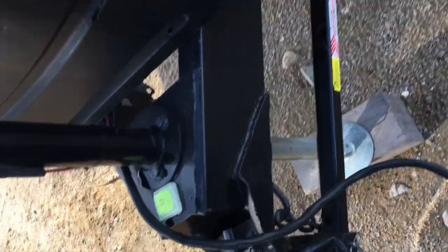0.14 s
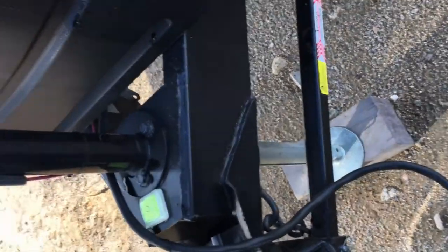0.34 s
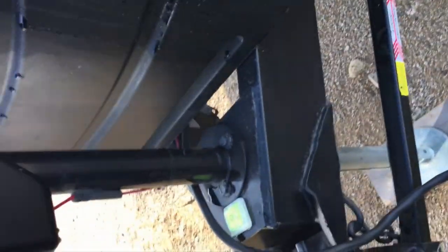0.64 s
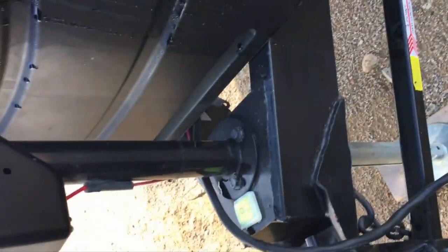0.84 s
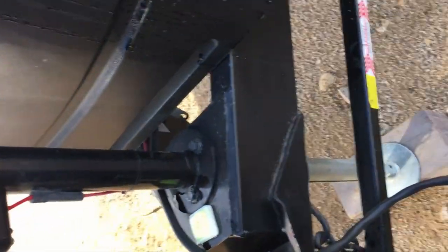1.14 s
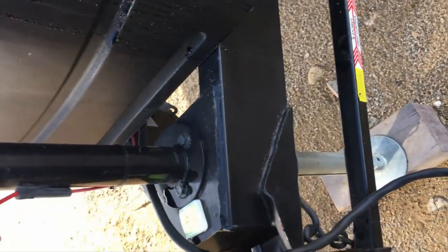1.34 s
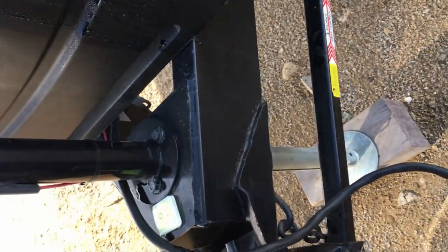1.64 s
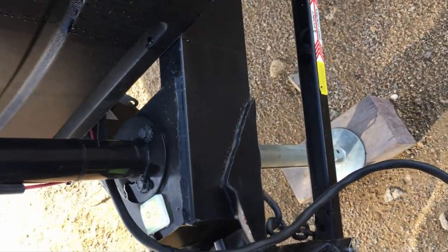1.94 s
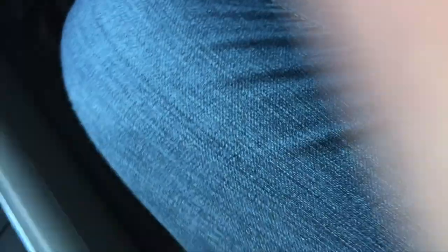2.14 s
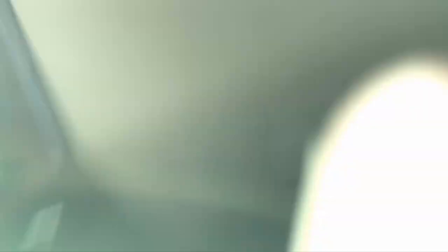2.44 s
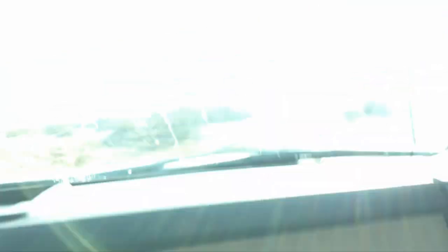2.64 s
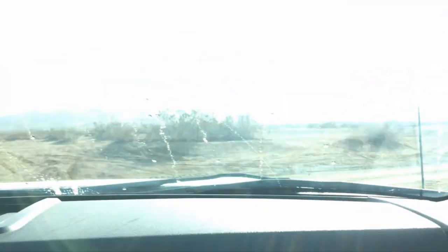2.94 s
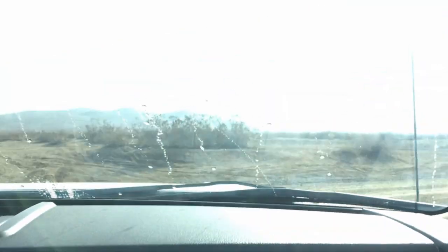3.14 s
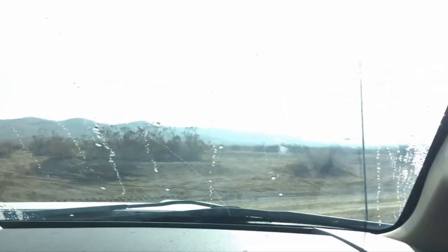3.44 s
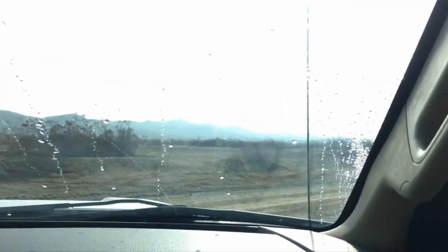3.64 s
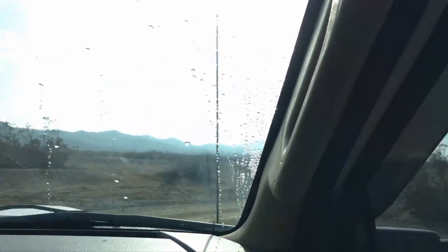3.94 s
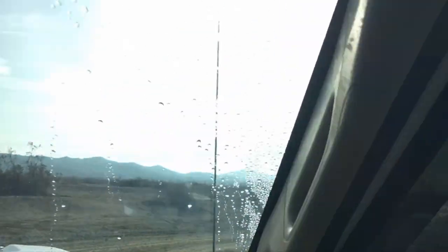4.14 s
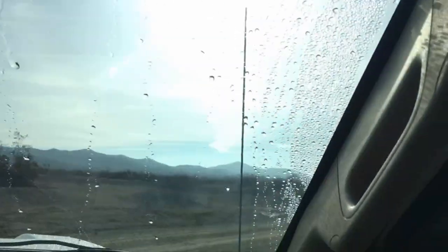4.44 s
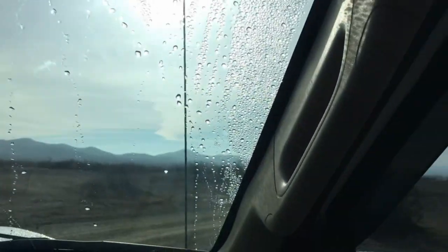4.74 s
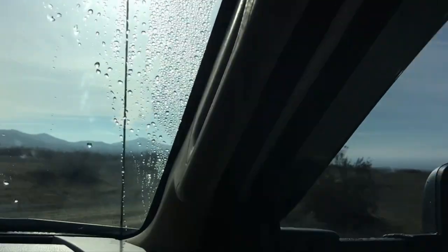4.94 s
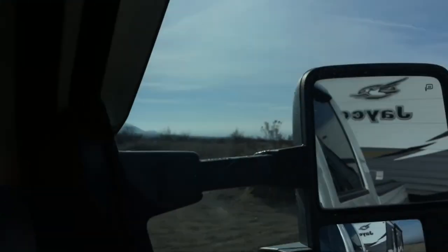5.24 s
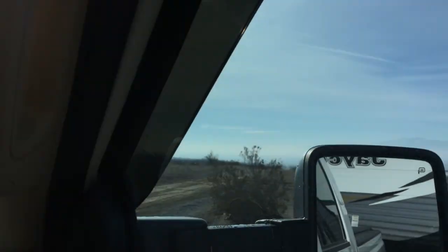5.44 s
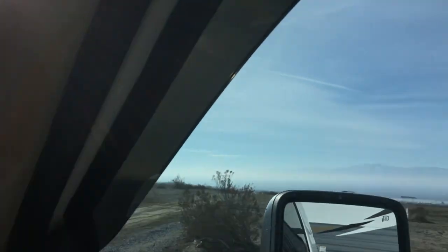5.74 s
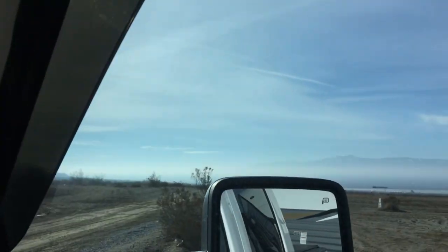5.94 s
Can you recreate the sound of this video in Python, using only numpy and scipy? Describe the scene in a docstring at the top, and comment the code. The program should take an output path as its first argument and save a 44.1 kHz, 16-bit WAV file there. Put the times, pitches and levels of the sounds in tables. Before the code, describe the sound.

A loud, rough motor-and-gear grind with metallic rattle and small grabbing chirps fills the first two seconds, recorded at arm's length. It cuts abruptly to the inside of a truck creeping along a dirt track, dull and bassy. A hand brushes and taps the camera, the engine note rises slightly then sinks, and loose panels click and clack over rougher ground.

```python
"""First an electric trailer jack runs close by: gears whine, teeth grind and rattle, the brushes hiss.
Tones stand for its gears and motor, filtered noise for its friction, dying sines for its ringing post.
After a moment of near silence we sit in a truck creeping along a dirt track: low tones make the engine drone,
noise the tyre rumble and grit, and dying sines the knocks of loose trim. A hand ticks and brushes on a camera.
Soft thuds of filtered noise fall in both parts, over a faint steady hiss."""
import sys
import numpy as np
from scipy import signal
from scipy.fft import rfft, irfft
from scipy.io import wavfile

SR = 44100
rng = np.random.default_rng(int(sys.argv[2]) if len(sys.argv) > 2 else 0)


def int16_out(signal):
    """Quantize to a 16-bit WAV file."""
    q = np.round(np.clip(np.atleast_2d(signal).T, -1, 1) * 32767)
    wavfile.write(sys.argv[1], SR, q.astype(np.int16))


N = 269010
TIME, HZ = np.arange(N) / SR, np.fft.rfftfreq(N, 1 / SR)  # seconds; frequencies of a full-length spectrum

JACK_OFF_S, CABIN_ON_S = 2.1335, 2.181
EDGE_HZ = 15700  # upper limit of the sound

# turning rate of the jack's first gear: (time [s], rate [Hz])
GEAR_SPEED = [(0.0, 67.04), (0.25, 67.73), (1.55, 69.21), (1.85, 68.46)]
# whine of the gear train: (multiple of the turning rate, relative level [dB])
GEAR_TONES = [(.62, -43), (1, -59), (1.23, -48.5), (1.86, -51.5), (3.08, -40.5), (4.6, -42), (4.92, -52.5),
              (6.02, -47), (7, -47), (8.03, -41.5), (8.88, -48.5), (9.08, -42), (11, -41), (12, -52),
              (13.95, -43), (15, -36.5), (15.8, -52), (17, -40.5), (17.85, -35.5), (19.8, -41), (23, -41.5),
              (27.1, -43), (32.2, -37.5), (37.3, -49), (38.3, -51.5), (45.3, -51)]
# resonances of the gear housing and jack post: (frequency [Hz], width [Hz], boost [dB])
HOUSING_RESONANCES = [(1018, 144, 4.5), (1180, 27, 5), (1250, 36, 6), (1433, 80, 7), (1878, 29, 8.5),
                      (2040, 57, 5), (2247, 250, 9), (2586, 270, 8.5), (2850, 30, 14), (3440, 210, 7),
                      (5260, 95, 10), (5520, 350, 5.5), (6060, 100, 8.5), (6600, 430, 4), (8700, 1100, 9.5),
                      (9900, 320, 14), (10710, 170, 15), (11500, 780, 12.5)]
# broad colour of the grinding teeth: (frequency [Hz], relative level [dB])
GRIND_COLOUR = [(25, -50), (48, -0.5), (90, -9.5), (150, -11), (270, -6), (400, -12.5), (600, -11.5),
                (850, -8.5), (1100, 2.5), (1600, -1.5), (2400, -12.5), (3800, -17), (4800, -46),
                (8000, -36.5)]
# broad colour of the brush hiss: (frequency [Hz], relative level [dB])
BRUSH_COLOUR = [(1500, -11.5), (4000, 8.5), (5000, 1), (6500, 1), (7600, -5.5), (10000, -11.5), (12500, -9),
                (13600, 0), (14700, -44), (16000, -40)]
# motor hum at HUM_ORDER times the turning rate: (time [s], level [dB])
HUM_LEVEL = [(0.0, -41), (0.13, -30), (0.19, -45), (0.24, -30.5), (0.37, -28), (0.44, -34), (0.52, -32.5),
             (0.87, -31), (1.1, -40), (1.28, -36.5), (1.46, -32), (1.61, -31), (1.7, -35), (1.87, -29.5),
             (2.0, -31), (2.12, -36.5)]
# bursts in which the gear mesh grabs: (start [s], length [s], relative level [dB])
MESH_GRABS = [(0.002, 0.022, -18.5), (0.045, 0.075, -23), (0.138, 0.019, -19), (0.167, 0.038, -17.5),
              (0.242, 0.029, -22), (0.282, 0.058, -22), (0.405, 0.039, -19.5), (0.455, 0.055, -21),
              (0.521, 0.049, -21.5), (0.6, 0.036, -21), (0.673, 0.055, -23.5), (0.845, 0.018, -20),
              (0.983, 0.018, -21), (1.017, 0.04, -24), (1.11, 0.08, -22), (1.231, 0.027, -23),
              (1.302, 0.032, -19.5), (1.3685, 0.019, -18), (1.41, 0.075, -23.5), (1.498, 0.026, -21.5),
              (1.587, 0.027, -23), (1.66, 0.04, -24), (1.714, 0.033, -24), (1.826, 0.017, -19.5),
              (1.921, 0.067, -25.5), (2.063, 0.019, -24), (2.099, 0.017, -23)]
# main ring of the steel post: (frequency [Hz], relative level [dB], time to fall 60 dB [s])
POST_MODES = [(1368, -10.5, 0.043), (1437, -2.5, 0.039), (1452, -4.5, 0.029)]
GRIND_DB, HISS_DB = -24, -38.5  # starting levels, before they swell and fade
RASP_DB, RASP_DB_PER_S = -1, -0.43  # gain of the grind's upper part, slowly falling
HUM_ORDER = 10

# firing rate of the engine: (time [s], rate [Hz])
FIRING_RATE = [(2.18, 44.47), (2.85, 45.8), (3.31, 50.66), (3.6, 51.03), (4.35, 52.06), (4.6, 49.95),
               (4.8, 46.95), (5.1, 45.27), (5.5, 45.6), (5.7, 43.2)]
# boom of the engine in the cabin: (time [s], relative level [dB])
DRONE_LEVEL = [(2.18, -39), (2.26, -28), (2.4, -27.5), (2.75, -32.5), (2.9, -26.5), (3.06, -37), (3.2, -36),
               (3.28, -27.5), (3.62, -28.5), (3.9, -26.5), (4.38, -27), (4.46, -38), (4.53, -31),
               (4.76, -31), (4.85, -36), (4.94, -30.5), (5.03, -36.5), (5.33, -30), (5.46, -36),
               (5.52, -29), (5.68, -40), (6.1, -30)]
# firing note and overtones: (multiple of the firing rate, relative level [dB])
ENGINE_TONES = [(1, 2.5), (2, -19), (3, -16), (4, -24.5)]
# roughness of the track under the tyres: (time [s], roughness [dB])
ROAD_ROUGHNESS = [(2.2, -1.5), (2.75, 0.5), (3.05, -3.5), (3.6, -2), (3.95, 1), (4.55, 1), (4.95, 1.5),
                  (5.3, 7.5), (5.7, 5.5), (5.97, -0.5)]
# broad colour of the tyre rumble: (frequency [Hz], relative level [dB])
RUMBLE_COLOUR = [(15, -28), (30, -22), (50, 2), (80, 3), (115, -2), (160, -4.5), (220, -13.5), (300, -13),
                 (420, -20.5), (650, -25), (1500, -85), (5000, -96)]
# broad colour of the gravel, and of the faint hiss: (frequency [Hz], relative level [dB])
RUSTLE_COLOUR = [(200, 7), (500, -2.5), (750, 3.5), (1100, 2), (1600, -2.5), (2200, -7), (3000, -8.5),
                 (4200, -15), (7000, -22), (10000, -28), (15000, -40)]
# resonances of the cabin and its panels: (frequency [Hz], width [Hz], boost [dB])
CABIN_RESONANCES = [(157, 43, 0), (241, 66, 4.5), (340.6, 18, 5), (680, 160, 4), (1460, 190, 4),
                    (2480, 910, 1.5)]
RUMBLE_DB, RUMBLE_FOLLOW = -36, 0.43  # level at zero roughness; dB per dB of roughness
RUSTLE_DB, RUSTLE_FOLLOW = -52, 1
SWAY_DB, SWAY_PER_S = 0.37, 15  # small ruts swell both at random

# knocks of loose trim: (first contact [s], relative level [dB], main ring [Hz], second ring [Hz],
# how far these two stand out [dB], treble tilt [dB per octave])
TRIM_KNOCKS = [(3.514, -47.5, 1345, 605, 4, -9), (4.180, -21.5, 1170, 828, 7, -1),
               (4.205, -44, 1733, 2100, 3, 8), (4.584, -52, 2850, 2460, 2, 10),
               (4.608, -47.5, 1162, 1495, 3, 5), (4.652, -49, 2460, 2130, 10, -5),
               (4.774, -24, 1730, 1480, -7, -0.5), (5.241, -37, 849, 1495, 11, 1.5),
               (5.307, -34.5, 1495, 1735, -2, 0), (5.312, -32.5, 850, 636, 6, -2.5),
               (5.432, -43, 1735, 1495, 17, -2), (5.462, -34.5, 850, 1005, 19, -3),
               (5.614, -44, 2850, 2870, 10, 3), (5.685, -25, 602, 1005, 3, 2),
               (5.692, -31, 591, 1735, 3, -9), (5.72, -33, 604, 1497, 3, 0.5),
               (5.801, -60, 2152, 2150, 7, 3), (5.847, -42.5, 1340, 2830, 8, 0),
               (5.865, -54, 2850, 850, 8, 4), (5.889, -46, 1006, 2166, 12, 2),
               (5.991, -50, 1488, 2850, 10, 1), (6.078, -29.5, 2130, 2130, 14, -4),
               (6.0793, -21.5, 880, 1300, 11, -2)]
# ring of the loose trim: (frequency [Hz], relative level [dB], time to fall 60 dB in a knock [s])
TRIM_MODES = [(325, -9.5, 0.058), (545, -6, 0.08), (603, -3.5, 0.052), (852, -1.5, 0.051),
              (1006.3, -2, 0.06), (1180, -2, 0.047), (1373, -11, 0.05), (1480, 0.5, 0.045),
              (1723, -5, 0.036), (2015, -9, 0.043), (2096, -0.5, 0.026), (2530, -7, 0.029),
              (2900, -18, 0.036), (3580, -24, 0.065)]
# noisy part of a knock, before its tilt: (frequency [Hz], relative level [dB])
CLACK_COLOUR = [(200, 6.5), (600, 1.5), (1500, 11), (2600, 3.5), (3600, -3.5), (5500, -10.5), (8000, -12.5),
                (11000, -20), (15000, -28)]
# rough scuffs of hand and trim: (middle [s], level [dB], half length [s])
SCUFF_STROKES = [(2.533, -41, 0.0093), (3.585, -46, 0.043), (4.078, -46, 0.04), (4.382, -43.5, 0.027),
                 (5.245, -33, 0.0087), (5.308, -33, 0.006), (5.319, -37, 0.006)]
# colour of the scuffs: (frequency [Hz], relative level [dB])
SCUFF_COLOUR = [(200, 12), (350, 15.5), (650, 19.5), (1100, 8), (1600, 9), (2400, 2.5), (3800, -5),
                (6000, -55), (14000, -56)]

# finger ticks on the camera: (time [s], level [dB])
FINGER_TICKS = [(2.1834, -37), (2.239, -45), (2.282, -38), (2.389, -32.5), (2.4903, -26.5), (2.528, -34),
                (2.543, -30.5), (3.2615, -23.5), (3.393, -27.5)]
# ring of the camera case: (frequency [Hz], relative level [dB], time to fall 60 dB [s])
CASE_MODES = [(1850, 4.5, 0.0091), (2570, 9, 0.0071), (3400, 2, 0.0045), (4480, -6, 0.011),
              (6060, -4, 0.0082), (9130, 1.5, 0.0035)]
# strokes of the hand sliding on the camera: (start [s], length [s], relative level [dB])
HAND_STROKES = [(2.176, 0.061, -54), (2.255, 0.17, -60.5), (2.43, 0.1, -57.5), (2.523, 0.024, -48),
                (2.553, 0.036, -49)]
# colour of skin on the camera: (frequency [Hz], relative level [dB])
SKIN_COLOUR = [(500, -12), (2200, 3), (4500, -2), (7000, -6), (11000, -8.5), (14500, -15), (16000, -22)]
STROKE_ATTACK_S, STROKE_RELEASE_S = 0.0071, 0.0099
# dull bumps of camera and truck body: (middle [s], level [dB], pitch [Hz], half length [s])
SOFT_BUMPS = [(0.647, -30, 79.4, 0.031), (1.544, -33.5, 84.66, 0.028), (2.831, -38, 105, 0.15),
              (3.196, -36.5, 135, 0.059), (3.49, -38, 108, 0.06), (4.097, -36.5, 135, 0.04),
              (5.116, -34, 220, 0.006), (4.58, -30.5, 87.5, 0.13), (5.17, -32, 149, 0.039),
              (5.348, -35, 137, 0.047), (5.71, -32, 280, 0.024), (5.726, -35.5, 119.9, 0.055),
              (5.856, -30.5, 111, 0.035)]


def jack(hiss_side_db=-17.0, surge_db=1.65, blow_share=0.37):
    """Uneven tooth blows and sliding friction ring the housing; the brushes hiss with each turn."""
    turns = np.cumsum(curve(GEAR_SPEED)) / SR
    once_a_turn = np.cos(2 * np.pi * turns)
    # a slow reduction gear, 0.1406 s a turn, binds twice a turn, once harder
    slow_turns = (TIME - .052) / .1406
    surge = surge_db * (np.cos(4 * np.pi * slow_turns) + 0.57 * np.cos(2 * np.pi * slow_turns))
    housing_db = resonances(HOUSING_RESONANCES)
    grind = grinding(turns, once_a_turn, surge, housing_db, blow_share)
    toothed = rattle(gear_whine(turns, surge) + grind)
    hiss, side = brush_hiss(turns, once_a_turn, surge, housing_db)
    middle = toothed + motor_tones(turns, surge) + post_ring(turns) + hiss
    # only the hiss differs between left and right
    return middle + amp(hiss_side_db) * np.array([side, -side])


def grinding(turns, once_a_turn, surge, housing_db, blow_share):
    """Four teeth a turn strike unevenly and rub; the housing colours the noise, brighter as it binds."""
    teeth = 4 * turns
    blows = np.diff(np.floor(teeth), prepend=0) * rng.uniform(-0.38, 1, N)
    # rubbing is strongest just after each tooth meets
    friction = (1 + np.exp(-(teeth % 1) / 0.65)) * rng.standard_normal(N)
    drive = (blow_share * unit(blows) + unit(friction)) * amp(1.0 * once_a_turn + 0.17 * surge)
    grind = colour(drive, GRIND_COLOUR, housing_db)
    high_pass = signal.butter(2, 2000, "high", fs=SR, output="sos")
    rasp = signal.sosfiltfilt(high_pass, grind)
    rasp_gain = amp(RASP_DB + RASP_DB_PER_S * TIME + 1.6 * surge)
    return amp(GRIND_DB) * (grind + (rasp_gain - 1) * rasp)


def gear_whine(turns, surge_db, waver=0.39, slack=0.0023, wander_db=0.65):
    """Gear tones waver, the high ones wandering most; play between the teeth shakes their phase."""
    out = np.zeros(N)
    for order, db in GEAR_TONES:
        phase = order * (turns + slack * drift(37)) + rng.random()
        wander = amp(wander_db * np.sqrt(order) * drift(5.0))
        tone = wander * (1 + waver * drift(37)) * np.cos(2 * np.pi * phase)
        out += amp(db) * unit(tone)
    return out * amp(.5 * surge_db)


def rattle(x, start_db=-2.5, db_per_s=2.0, shift_db=1.4):
    """The rattle of the teeth at about 2-2.7 kHz comes and goes, and slowly grows."""
    band_pass = signal.butter(2, [1950, 2700], "band", fs=SR, output="sos")
    band = signal.sosfiltfilt(band_pass, x)
    gain = amp(start_db + db_per_s * TIME + shift_db * drift(20))
    return x + (gain - 1) * band


def motor_tones(turns, surge_db, slack=0.0041, rest_db=-38, grab_db=-4.0):
    """The motor's hum throbs as the gear binds; an octave up, the mesh tone leaps out at every grab."""
    hum_waver, hum_follow, mesh_waver = .22, 1.5, .2
    phase = 2 * np.pi * HUM_ORDER * (turns + slack * drift(52))
    throb = amp(hum_follow * surge_db) * (1 + hum_waver * drift(43))
    hum = amp(curve(HUM_LEVEL)) * unit(throb * np.cos(phase))
    mesh_level = amp(rest_db) + amp(grab_db) * grabbing()
    mesh = mesh_level * unit((1 + mesh_waver * drift(90)) * np.sin(2 * phase))
    return hum + mesh


def post_ring(turns, share_db=-5):
    """The gear nudges the post twice a turn, strong then weak, and it rings in short bursts."""
    beats = np.floor(2 * (turns + .02 * drift(60)))
    strength = (1 - 0.2 * (beats % 2)) * rng.uniform(0.35, 1, N)
    nudges = np.diff(beats, prepend=beats[0]) * strength
    t = np.arange(4096) / SR
    one_ring = modes(POST_MODES, t) * (1 - np.exp(-t / 0.0024))
    ring = signal.oaconvolve(nudges, one_ring)[:N]
    return amp(share_db) * grabbing() * unit(ring)


def grabbing(attack_s=0.0026, release_s=0.007):
    """How hard the mesh grabs: each burst rises, holds and dies away; the strongest counts."""
    return np.max([amp(db) * hold(s, length, attack_s, release_s) for s, length, db in MESH_GRABS], 0)


def brush_hiss(turns, once_a_turn, surge, housing_db):
    """Brush contact changes with each turn, the binding and chance; two noises share its level."""
    twice_a_turn = np.cos(4 * np.pi * turns)
    flicker_db = 1.2 * drift(500) + 0.48 * drift(38)
    contact = amp(HISS_DB + 0.62 * once_a_turn + 0.6 * twice_a_turn + .5 * surge + flicker_db)
    return [contact * colour(rng.standard_normal(N), BRUSH_COLOUR, housing_db) for _ in range(2)]


def engine(level_db=-1, waver_db=1.0):
    """The firing note booms and wavers in the cabin; its overtones come and go."""
    turns = np.cumsum(curve(FIRING_RATE)) / SR
    tones = np.zeros(N)
    for order, db in ENGINE_TONES:
        swell = 1 + 0.57 * (order - 1) * drift(3.1)
        tones += amp(db) * swell * np.cos(2 * np.pi * (order * turns + rng.random()))
    return amp(curve(DRONE_LEVEL) + level_db + waver_db * drift(9.9)) * unit(tones)


def road(grit_per_s=130, grit=1.0):
    """Tyres rumble through the body; gravel and trim crackle faintly above, more so on rough ground."""
    cabin_db = resonances(CABIN_RESONANCES)
    rough_db = curve(ROAD_ROUGHNESS) + SWAY_DB * drift(SWAY_PER_S)
    rumble = colour(rng.standard_normal(N), RUMBLE_COLOUR, cabin_db)
    # stones hit at random times with random force, each a short burst of noise
    stones = (rng.random(N) < grit_per_s / SR) * amp(4 * np.minimum(rng.exponential(1, N), 3))
    power = signal.lfilter([1], [1, -np.exp(-1 / (0.0054 * SR))], stones ** 2)
    crackle = unit(np.sqrt(power) * rng.standard_normal(N))
    rustle = colour(rng.standard_normal(N) + grit * crackle, RUSTLE_COLOUR, cabin_db)
    rumble_level = amp(RUMBLE_DB + RUMBLE_FOLLOW * rough_db)
    rustle_level = amp(RUSTLE_DB + RUSTLE_FOLLOW * rough_db)
    return rumble_level * rumble + rustle_level * rustle


def knocks(seat_s=.0028, touch=0.38, touch_ring=0.5, clack_db=-11, clack_t60=0.072,
           cabin_db=-31, cabin_t60=0.25, second_share=0.52, focus_octaves=0.14):
    """A loose panel touches, then seats hard; where it is struck decides which two modes ring most."""
    out, t = np.zeros(N), np.arange(SR // 5) / SR
    hz, mode_db, t60 = np.transpose(TRIM_MODES)[:, :, None]  # one row a mode
    for s, db, main_hz, second_hz, focus_db, tilt_db in TRIM_KNOCKS:
        main, second = (np.exp(-(np.log2(hz / f) / focus_octaves) ** 2) for f in (main_hz, second_hz))
        weight = amp(mode_db + tilt_db * np.log2(hz / main_hz)) + amp(focus_db) * (main + second_share * second)
        # each knock shifts the pitches slightly
        knock_hz = hz * (1 + 0.0061 * rng.standard_normal(hz.shape))
        swing = np.sin(2 * np.pi * (knock_hz * t + rng.random(hz.shape)))
        ring = (weight * amp(-60 * t / t60) * swing).sum(0) / np.linalg.norm(weight)
        tilt = tilt_db * np.log2(np.fft.rfftfreq(len(t), 1 / SR) / main_hz + 0.13)
        contact, clack = (colour(rng.standard_normal(len(t)), CLACK_COLOUR, tilt) for _ in range(2))
        # a quick clack, then a fainter, longer tail in the cabin
        clack = clack * (amp(clack_db - 60 * t / clack_t60) + amp(cabin_db - 60 * t / cabin_t60))
        force = amp(db + 6.0) * (1 - np.exp(-t / 0.000081))
        add(out, s, force * touch * (contact + touch_ring * ring) * np.exp(-t / 0.0043))
        add(out, s + seat_s, force * (ring + clack))
    return out


def jiggle(db=-50.0, middle_s=5.47, half_s=0.28, taps_per_s=45, centre_hz=1450):
    """Light random taps of the loose trim on the rough stretch; each mode dies in half its knock time."""
    t = np.arange(4096) / SR
    out = np.zeros(N)
    for hz, _, t60 in TRIM_MODES:
        weight = np.exp(-np.log2(hz / centre_hz) ** 2)
        taps = (rng.random(N) < taps_per_s / SR) * rng.uniform(-1.1, 1, N)
        out += weight * signal.oaconvolve(taps, modes([(hz, 0, .5 * t60)], t))[:N]
    return amp(db) * np.exp(-((TIME - middle_s) / half_s) ** 2) * unit(out)


def hand(catch_db=2.0):
    """Dry finger ticks ring the camera case; skin hisses as it slides and catches on the camera."""
    pressure = sum(amp(db) * hold(s, length, STROKE_ATTACK_S, STROKE_RELEASE_S)
                   for s, length, db in HAND_STROKES)
    slips = unit((rng.random(N) < 450 / SR) * rng.uniform(-1, 1, N))  # about 450 a second
    skin = colour(rng.standard_normal(N) + slips, SKIN_COLOUR)
    out = pressure * amp(catch_db * drift(90)) * skin
    t = np.arange(1024) / SR
    case_ring = modes(CASE_MODES, t)
    case_ring = case_ring / abs(case_ring).max()
    for s, db in FINGER_TICKS:
        touch = colour(rng.standard_normal(len(t)), SKIN_COLOUR) * np.exp(-t / 0.00089)
        add(out, s, amp(db) * (case_ring + 0.21 * touch))
    return out


def scuffs(catch_db=3):
    """Brief strokes in which a surface catches and slips: noise with a jumpy level."""
    stroke = sum(amp(db) * np.exp(-((TIME - s) / half) ** 2) for s, db, half in SCUFF_STROKES)
    return stroke * colour(rng.standard_normal(N) * amp(catch_db * drift(300)), SCUFF_COLOUR)


def bumps(width_octaves=0.45):
    """Soft thuds of the hand-held camera and the truck body: narrow bands of noise that swell and fade."""
    out = np.zeros(N)
    for s, db, hz, half in SOFT_BUMPS:
        band = np.exp(-(np.log2((HZ + 1) / hz) / width_octaves) ** 2)
        thud = unit(irfft(rfft(rng.standard_normal(N)) * band, N))
        out += amp(db) * np.exp(-((TIME - s) / half) ** 2) * thud
    return out


def faint_hiss():
    """Steady quiet noise under everything, also heard in the pause."""
    return amp(-59.5) * colour(rng.standard_normal(N), RUSTLE_COLOUR)


def amp(db):
    """Decibels to gain."""
    return 10 ** (np.asarray(db) / 20)


def unit(x):
    """Scales to an average (rms) level of 1."""
    return x / np.sqrt(np.mean(x ** 2) + 1e-20)


def curve(rows):
    """Draws straight lines through a table of (time [s], value), one value a sample."""
    return np.interp(TIME, *np.transpose(rows))


def hold(start_s, length_s, attack_s, release_s):
    """A level that rises in a straight line, holds at 1 and dies away."""
    rise = np.clip((TIME - start_s) / attack_s, 0, 1)
    return rise * np.exp(-np.maximum(TIME - start_s - length_s, 0) / release_s)


def colour(x, points, extra_db=0):
    """Filters x by a spectrum drawn on a log-frequency axis; rms 1."""
    f, db = np.transpose(points)
    hz = np.fft.rfftfreq(len(x), 1 / SR)
    gain_db = np.interp(np.log(hz + 1), np.log(f), db) + extra_db
    return unit(irfft(rfft(x) * amp(gain_db), len(x)))


def resonances(rows):
    """Gain in dB of a set of resonances, at every frequency."""
    power = 1
    for hz, width, db in rows:
        power = power + (amp(abs(db)) ** 2 - 1) / (1 + (2 * (HZ - hz) / width) ** 2) ** 2
    return 10 * np.log10(power)


def modes(rows, t):
    """Dying sines of a struck object, of alternating sign."""
    return sum((-1) ** k * amp(db - 60 * t / t60) * np.sin(2 * np.pi * hz * t)
               for k, (hz, db, t60) in enumerate(rows))


def drift(rate):
    """Smooth chance of rms 1, changing up to about rate times a second."""
    spectrum = rfft(rng.standard_normal(N // 64))
    slow = irfft(spectrum * np.exp(-(HZ[:len(spectrum)] / rate) ** 2))
    return unit(np.interp(TIME, np.linspace(0, TIME[-1], len(slow)), slow))


def add(mix, s, sound):
    """Mixes a sound in at s seconds, cut off at the end of the mix."""
    part = mix[round(s * SR):][:len(sound)]
    part += sound[:len(part)]


def scene():
    """The jack, a moment of near silence, then the cabin."""
    cabin = engine() + road() + knocks() + jiggle() + hand() + scuffs()
    sources = jack() * (TIME < JACK_OFF_S) + cabin * (TIME > CABIN_ON_S)
    return sources + bumps() + faint_hiss()


def record(dry):
    """Takes away everything above the upper limit with a steep low-pass filter."""
    low_pass = signal.firwin(511, EDGE_HZ, window=("kaiser", 9), fs=SR)
    return signal.oaconvolve(dry, low_pass[None], "same")


dry = scene()
out = record(dry)
int16_out(out)
```